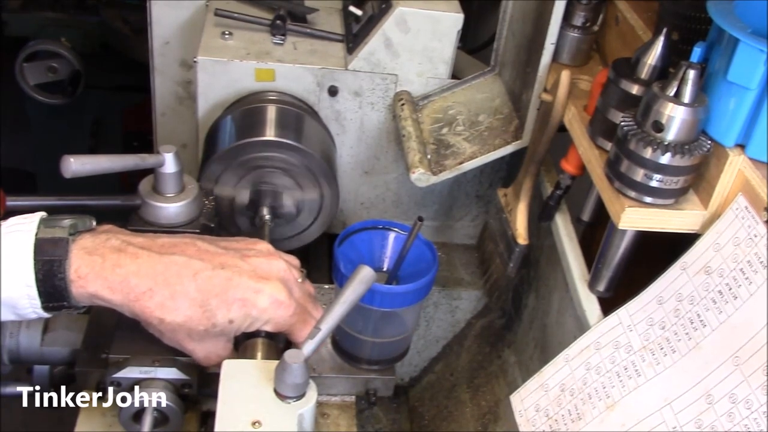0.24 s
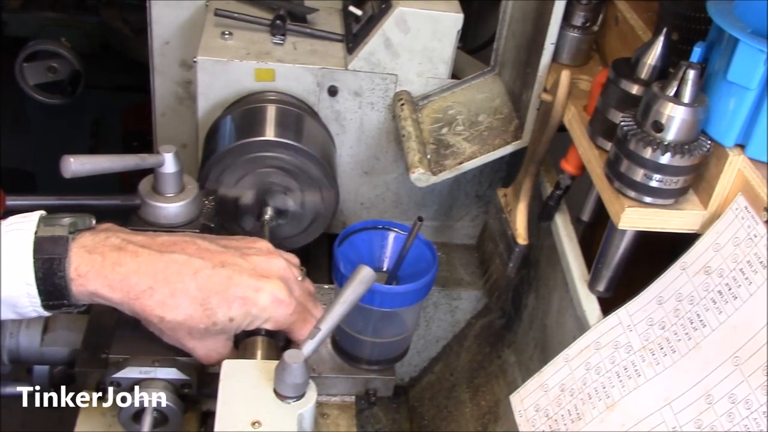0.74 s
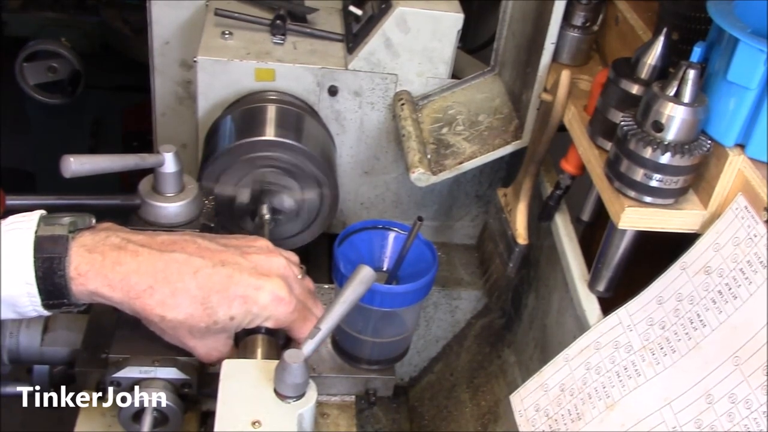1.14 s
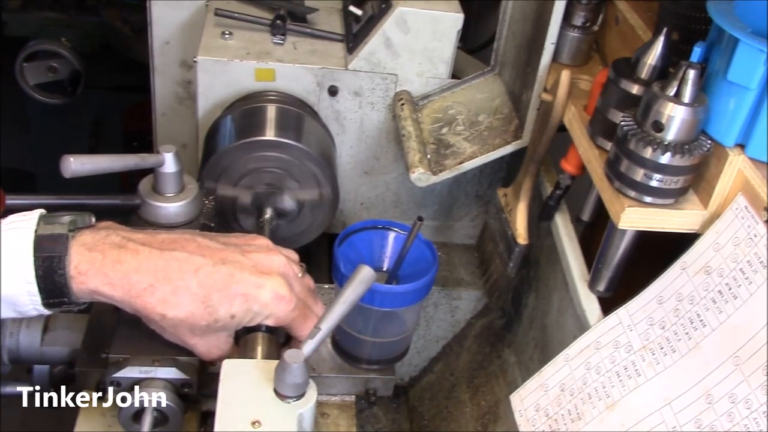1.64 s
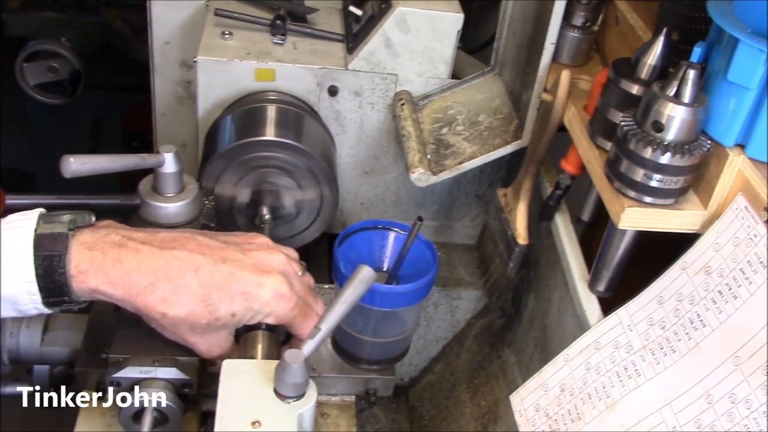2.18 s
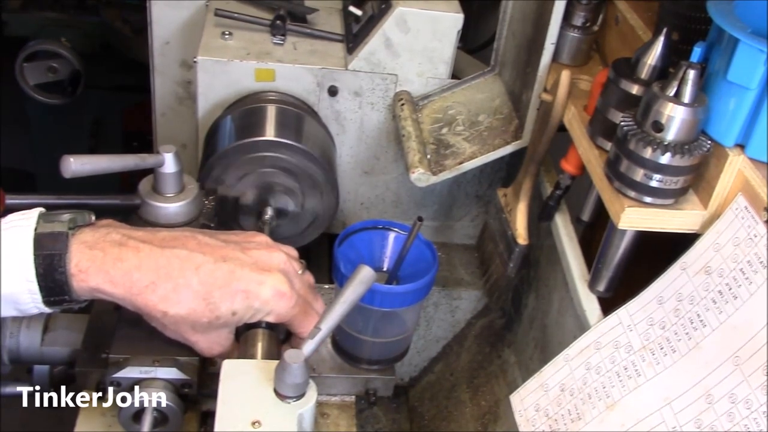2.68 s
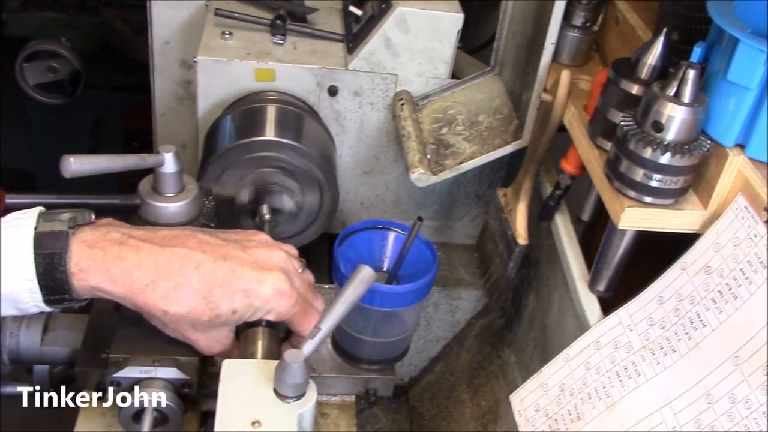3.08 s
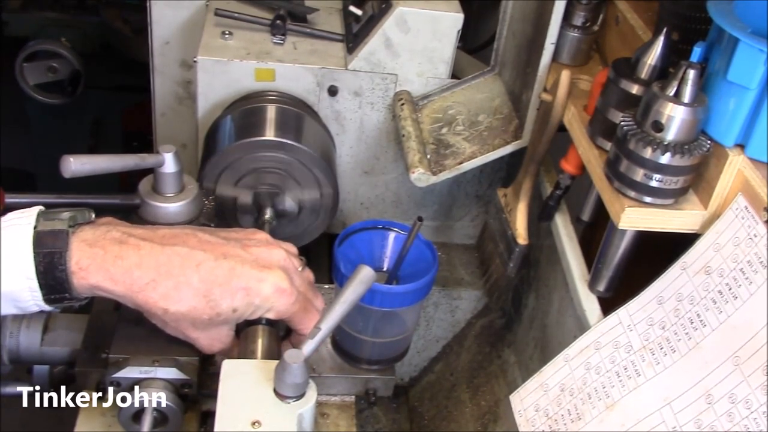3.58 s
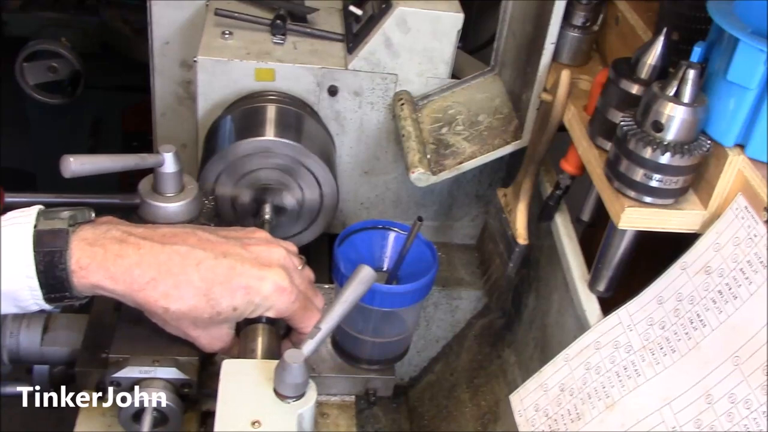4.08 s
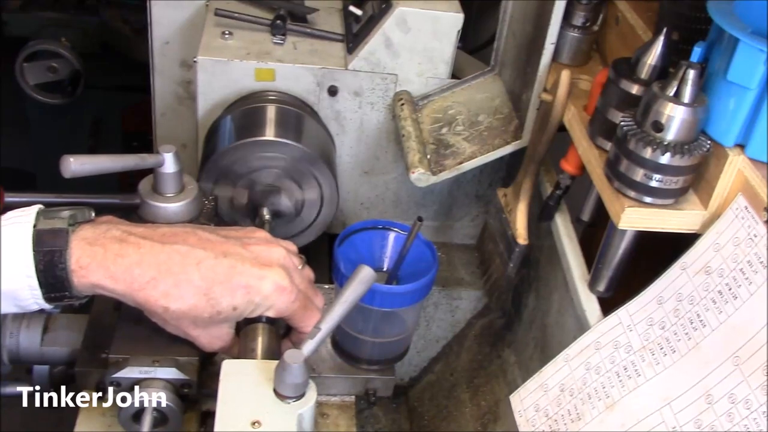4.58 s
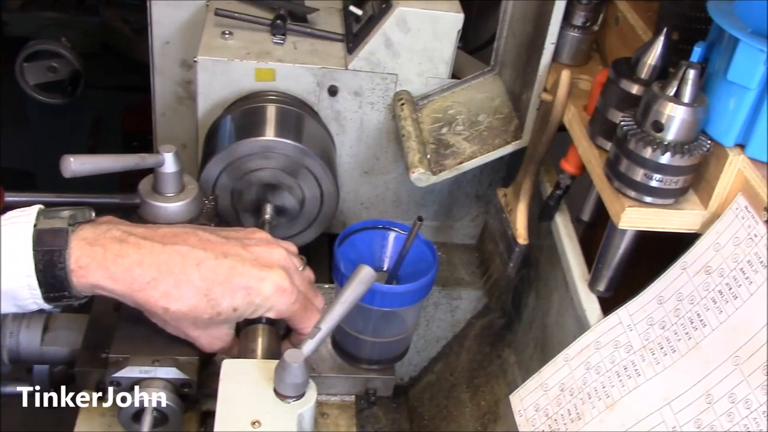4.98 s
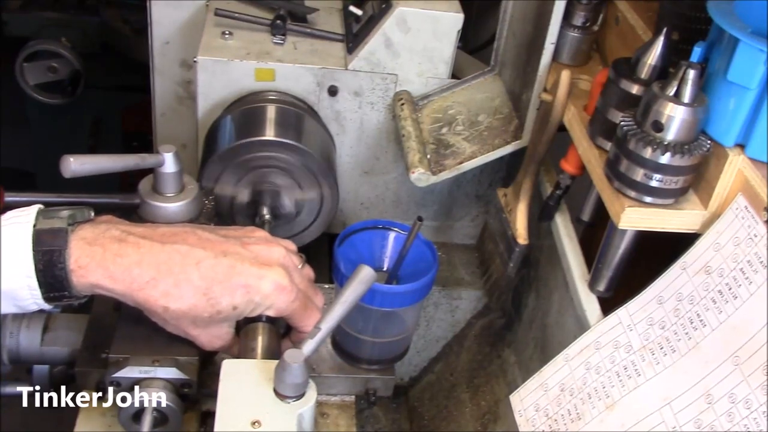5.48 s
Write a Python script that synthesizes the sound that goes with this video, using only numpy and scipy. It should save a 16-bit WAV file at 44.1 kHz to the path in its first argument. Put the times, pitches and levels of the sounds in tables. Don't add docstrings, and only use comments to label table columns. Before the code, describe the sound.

Close, continuous machine drone from a small workshop lathe: a nasal, fluttering belt hum with thin whine, soft rumble and hiss.

```python
import sys
import numpy as np
from scipy import signal
from scipy.fft import rfft, irfft
from scipy.io import wavfile
from scipy.ndimage import uniform_filter1d

SR = 44100
rng = np.random.default_rng(int(sys.argv[2]) if len(sys.argv) > 2 else 0)


def store_pcm(level_fs):
    pcm = np.round(np.clip(level_fs, -1, 1) * 32767).astype(np.int16)
    wavfile.write(sys.argv[1], SR, np.atleast_2d(pcm).T)


def boost_factor(decibels):
    exponent = np.asarray(decibels, float) / 20
    return 10 ** exponent


N = 252693
t = np.arange(N) / SR
BELT_HZ = 4.538

# (time [s], tooth rate [Hz], belt bite [dB])
FEED = [(0, 563, 0.5), (.3, 564.3, .5), (.9, 564.3, 0), (1.2, 564, 1.1), (1.9, 563, -0.1),
        (2.4, 562.6, -.5), (3.0, 563, -0.4), (3.2, 564, -1), (3.5, 564.5, 1.5), (3.8, 563.7, -2),
        (4.0, 564, 0), (4.32, 563.7, -1.5), (4.72, 564, -0.4), (4.88, 565, 0.5), (5.3, 565.5, 0.7),
        (5.45, 563, -1.6), (5.73, 563.3, -.5)]
# (turn [0-1], hum [dB], tooth lead [rad], rattle [dB])
BELT_TURN = [(0, 3, 0.029, 4), (.1, 2, 0.1, -0.2), (.2, 1.8, -.17, 5.5), (.33, 1.45, -0.21, 3.5),
             (.47, .7, 0.41, -1.5), (.58, -1.5, 0.87, 0.2), (.66, -5, .4, -1.1), (.78, -1, -0.17, 0.7),
             (.88, 0.3, -.5, 3)]
# (rate [Hz], hum swing [dB], its angle [turns], tooth lead [rad], its angle [turns],
# rattle swing [dB])
ECCENTRIC_SHAFTS = [(12.69, 0.43, 0.98, 0.09, 0.76, 0.44), (14.05, 0.61, 0.51, 0.1, 0.27, 0.42),
                    (17.23, 0.35, 0.56, 0.04, 0.41, 0.31), (29.66, 0.75, 0.85, 0.16, 0.73, 0.77),
                    (34.21, 0.47, 0.39, 0.02, 0.19, 0.06)]
# (time [s], length [s], low overtone boost [dB], ringing overtone boost [dB])
BELT_GRABS = [(.25, .033, 4, 2), (.72, 0.036, -10, 5), (0.878, .025, 8, 13.5), (1.324, .021, 12, 9),
              (1.59, .03, 5, 4), (1.816, .03, 1, 6), (1.961, 0.056, 9, 9), (2.02, 0.026, 6, 8),
              (2.27, 0.065, -2, -10), (2.493, .04, 12, -1), (2.92, 0.02, -6, 4), (3.3, 0.032, 5, 8),
              (3.36, .025, 4, 5), (3.605, 0.022, 6, 6.5), (3.952, 0.039, 12, 11), (4.008, 0.027, 7, 6),
              (4.18, 0.014, 9, 9), (4.447, 0.029, 2, 5), (4.653, .1, 1, -6), (4.833, 0.037, 6, 8.4),
              (4.867, 0.068, 12, 10.5), (5.047, .035, 6, 10), (5.115, 0.11, 1, 7.7),
              (5.289, 0.073, 14, 3.87), (5.35, 0.023, 6, 6.7), (5.561, 0.041, 6, 12)]
# (time [s], level [dB])
CATCHES_AND_SLIPS = [(.565, 2), (.993, -8), (1.062, -12), (1.23, 2), (1.696, 0), (1.855, 2), (2.282, -3),
                     (2.56, -2.5), (2.78, -4.5), (2.993, -3), (3.28, 2), (3.356, -4.5), (3.485, -11),
                     (3.806, -5), (4.124, -2), (4.325, -6), (4.35, 2), (4.4, 4.5), (4.535, -1), (4.74, 2.5),
                     (4.76, -3), (5.205, 3.5), (5.244, -4), (5.37, 3), (5.283, -4), (5.398, -10),
                     (5.584, 5), (5.618, -5.5), (5.657, 3)]
# (multiple of half the tooth rate [1], level [dB])
BELT_OVERTONES = [(4, -53), (8, -59), (9, -61.5), (10, -60.5), (12, -57.5), (14, -65), (16, -69), (18, -72),
                  (20, -68.5), (21, -66.5), (22, -68), (23, -68), (24, -56.5), (26, -67), (28, -63.5),
                  (29, -64.5), (30, -65), (33, -74), (34, -73), (35, -66), (40, -67), (42, -70), (48, -76),
                  (51, -70)]
# (frequency [Hz], level [dB])
RATTLE_SPECTRUM = [(2500, -32), (4200, -8.5), (5500, -11.5), (6500, -2.5), (8500, -2), (10500, -1.5),
                   (12500, -7.5), (14500, -12.5), (16000, -14)]
# (frequency [Hz], width [Hz], level [dB])
GUARD_MODES = [(1653, 46, -7.5), (1846, 73, -7), (1960, 100, -4), (3224, 54, -5), (4120, 78, -0.5),
               (4720, 51, 9), (4980, 100, -2), (5210, 74, 9.5), (5440, 92, 3.5), (6040, 60, 5.5),
               (7100, 90, -2), (7550, 51, 8), (7640, 120, -6), (7840, 46, 3), (8560, 56, 7), (8250, 50, -8),
               (9180, 60, 8), (9500, 70, 1), (9370, 80, -2), (10220, 60, 2), (10370, 70, 3), (10385, 54, 2),
               (10460, 60, 1), (10850, 80, 3), (11400, 90, -2), (12900, 90, 4), (13010, 100, -3),
               (13870, 70, 4), (14210, 80, 3), (14500, 90, -10)]
MOTOR_LINE_HZ = [114.3, 119.95, 219.2, 239.9, 281.8, 359.9, 443.8, 479.9, 683.8, 712, 860.4, 890.1, 1009.8,
                 1157.1, 1249.9, 1370, 1813.6]
MOTOR_LINE_DB = [-67, -67.5, -59.5, -59, -60, -60, -68.5, -62.5, -66, -65.5, -59.5, -55, -71, -68, -53, -59,
                 -65.5]
# (frequency [Hz], width [Hz], level [dB])
CASING_MODES = [(116.2, 36, -71), (178, 32, -63), (230, 19, -57.5), (252, 27.4, -51.5), (284.8, 42, -54.5),
                (350, 26.6, -55), (516, 31, -59.5), (598.3, 21, -51.5), (694, 39, -54), (846.6, 61, -60.5),
                (1140, 58, -55.5), (1269, 49, -62.5), (1404, 43, -58.5), (1699, 51, -59), (1954, 52, -58.5),
                (2545, 46, -64), (2696, 30, -65.5), (3167, 42, -61), (3677, 52, -65)]
# (frequency [Hz], density [dB per Hz])
RUMBLE_SPECTRUM = [(20, -42), (50, -41), (200, -13), (400, 1), (770, -6), (1500, -3.5), (1850, -8.5),
                   (2500, -5.5), (3500, -8.5), (4200, -18.5), (5600, -22), (9000, -16), (13000, -28),
                   (16000, -52)]
# (time [s], length [s], level [dB])
HAND_LEANS = [
    (.1, .3, -2),
    (3.3, .2, 2),
    (1.5, 0.36, 2.5),
    (2.2, .4, -1.5),
    (2.75, 0.33, 3),
    (3.051, .25, 2.5),
    (4.702, 0.25, 4.5),
    (5.4, 0.68, -3),
]
# (frequency [Hz], side minus mid [dB])
STEREO_WIDTH = [(60, -18), (115, -17), (190, -35), (490, -31), (770, -21), (950, -27), (1120, -22),
                (1300, -23), (1840, -22), (2300, -19.5), (4500, -17.5), (6800, -14.5), (8600, -17.5),
                (10000, -16.5), (14000, -15.5)]


def belt_drive():
    time, *columns = np.transpose(FEED)
    tooth_hz, bite_db = (np.interp(t, time, column) for column in columns)
    angle = 2 * np.pi * np.cumsum(tooth_hz) / SR

    turn, *patterns = np.transpose(BELT_TURN)
    hum_db, lead, loose_db = (np.interp(t * BELT_HZ, turn, p, period=1) for p in patterns)
    shake_ahead_s = 0.0076
    for hz, swing_db, swing_at, lead_rad, lead_at, shake_db in ECCENTRIC_SHAFTS:
        hum_db = hum_db + swing_db * cycle(hz * t + swing_at)
        lead = lead + lead_rad * cycle(hz * t + lead_at)
        loose_db = loose_db + shake_db * cycle(hz * (t + shake_ahead_s) + swing_at)
    drag_db = 0.27 * cycle(4.22 * t + 0.48)
    flap_db = 0.7 * cycle(5 * BELT_HZ * t + 0.16)
    loose_db = loose_db + flap_db + drag_db

    low_db, ring_db = belt_grabs()
    shake_db = loose_db + 0.25 * ring_db
    swell_db = overtone_swells(bite_db, loose_db, shake_db, drag_db, low_db, ring_db)
    hum_db = -32.5 + 0.9 * bite_db + hum_db
    rattle_db = -50 + bite_db + shake_db
    return angle, lead, hum_db, rattle_db, swell_db


def belt_grabs():
    return sum(np.outer(boosts, bump(at, 0.84 * length, snap=0.14)) for at, length, *boosts in BELT_GRABS)


def overtone_swells(bite_db, loose_db, shake_db, drag_db, low_db, ring_db):
    wander_db, wander_per_s, limit_db = 1.3, 6.8, 14
    free = 0.5 + 0.5 * np.tanh((t - 4.8) / 0.02)
    whine_db = 1.5 * bite_db + 2.5 * free + wander_db * walk(wander_per_s) + 2.16 * shake_db
    whine_db = limit_db * np.tanh(whine_db / limit_db)
    growl_db = 0.8 * bite_db + wander_db * walk(wander_per_s) + 0.62 * loose_db + 2.6 * drag_db

    swell_db = {k: whine_db if k >= 20 else growl_db for k, _ in BELT_OVERTONES}
    swell_db[4] = swell_db[4] + low_db
    swell_db[12] = swell_db[12] + ring_db
    swell_db[14] = swell_db[14] + 0.7 * ring_db + 0.5 * free
    return swell_db


def belt_hum(angle, lead, hum_db):
    slip_db = 0
    for at, db in CATCHES_AND_SLIPS:
        length = 0.016 if db > 0 else 0.011
        slip_db = slip_db + db * bump(at, length, snap=-0.14 * np.sign(db))
    tooth = boost_factor(hum_db + slip_db + 0.38 * walk(48)) * np.cos(angle + lead + 0.041 * walk(40))
    half_rate = boost_factor(-58 + 2 * walk(9.8)) * np.cos(angle / 2 - 3.5 * lead)
    return np.sqrt(2) * (tooth + half_rate)


def belt_overtones(angle, swell_db):
    out = 0
    for k, db in BELT_OVERTONES:
        drift_hz = walk(30.26) * (4.54 + 0.3985 * k)
        drift = 2 * np.pi * np.cumsum(drift_hz) / SR
        scatter = walk(60 + 3.9 * k) + 1j * walk(60 + 2.1 * k)
        tremble = 0.71 * boost_factor(-0.5 * swell_db[k]) * scatter
        tone = np.real((1 + tremble) * np.exp(1j * (0.5 * k * angle + drift)))
        out = out + level(boost_factor(swell_db[k]) * tone, db)
    return out


def tooth_rattle(angle, rattle_db):
    gate = 1 + 0.06 * np.cos(angle) + 0.06 * np.cos(2 * angle)
    hiss = level(guard(colour(rng.standard_normal(N), RATTLE_SPECTRUM)), -4.0)
    return hiss * gate * boost_factor(rattle_db + 0.91 * walk(41) + 0.4 * walk(400))


def guard(x):
    hz = np.fft.rfftfreq(N, 1 / SR)
    response_db = sum(db / (1 + (2 * (hz - f) / width) ** 2) for f, width, db in GUARD_MODES)
    decay = np.exp(-np.arange(900) / (SR * 0.008))
    echoes = boost_factor(-42) * rng.standard_normal(900) * decay
    echoes[0] = 1
    return irfft(rfft(x) * boost_factor(response_db) * rfft(echoes, N), N)


def motor():
    out = 0
    for hz, db in zip(MOTOR_LINE_HZ, MOTOR_LINE_DB):
        phase = 2 * np.pi * (hz * t + rng.random()) + 0.24 * walk(7.4)
        out = out + np.sqrt(2) * boost_factor(db + 1.57 * walk(10.7)) * np.cos(phase)
    return out


def casing():
    boom_db = 1.4 * walk(2.6) + sum(db * bump(at, length) for at, length, db in HAND_LEANS)
    modes = 0
    for hz, width, db in CASING_MODES:
        mode_db = db + 1.5 * walk(5.2) + boom_db * (hz < 400)
        modes = modes + boost_factor(mode_db) * ring(hz, width)
    rumble = level(guard(colour(rng.standard_normal(N), RUMBLE_SPECTRUM)), -45) * boost_factor(0.88 * walk(34.0))
    return (modes + rumble) * (1 + 0.11 * cycle(2 * 59.98 * t))


def ring(hz, width):
    b, a = signal.iirpeak(hz, hz / width, fs=SR)
    once = signal.lfilter(b, a, rng.standard_normal(N))
    return level(signal.lfilter(b, a, once), 0)


def colour(x, table):
    hz, db = np.transpose(table)
    bins = np.log(np.fft.rfftfreq(N, 1 / SR) + 1)
    return irfft(rfft(x) * boost_factor(np.interp(bins, np.log(hz), db)), N)


def walk(rate):
    k = max(int(SR / rate), 2)
    return level(uniform_filter1d(uniform_filter1d(rng.standard_normal(N), k), k), 0)


def bump(at, length, snap=0):
    span = length * (1 + snap * np.sign(t - at))
    return np.exp(-3 * ((t - at) / span) ** 2)


def cycle(turns):
    return np.cos(2 * np.pi * turns)


def level(x, db):
    return x * boost_factor(db) / np.sqrt(np.mean(x ** 2))


def scene():
    angle, lead, hum_db, rattle_db, swell_db = belt_drive()

    def machine():
        return belt_overtones(angle, swell_db) + tooth_rattle(angle, rattle_db) + motor() + casing()

    near, walls = machine(), machine()
    hum = belt_hum(angle, lead, hum_db)
    late_hum = np.roll(hum, int(SR * 0.0001))
    side = colour(walls, STEREO_WIDTH) + boost_factor(-26.5) * late_hum
    return np.array([near + hum + side, near + hum - side])


def band_limit(x):
    return signal.sosfilt(signal.butter(12, 15650, fs=SR, output="sos"), x)


def record(dry):
    rounded = np.tanh(10 * dry) / 10
    thin = signal.lfilter(*signal.butter(2, 55.3, "high", fs=SR), rounded)
    mix = thin * boost_factor(0.62)
    return band_limit(mix)


dry = scene()
out = record(dry)
store_pcm(out)
```